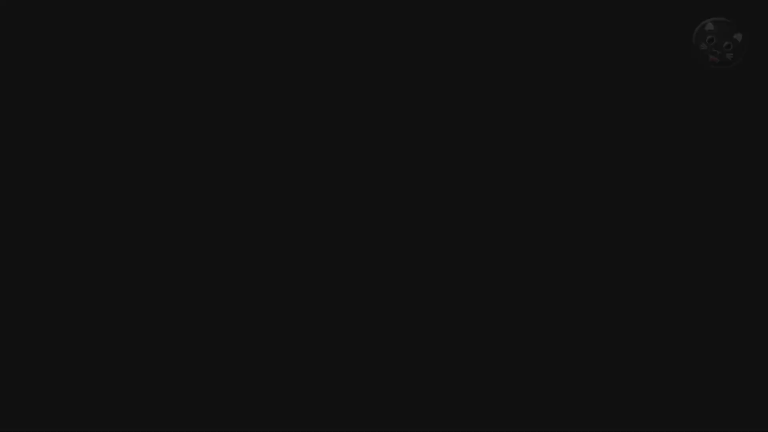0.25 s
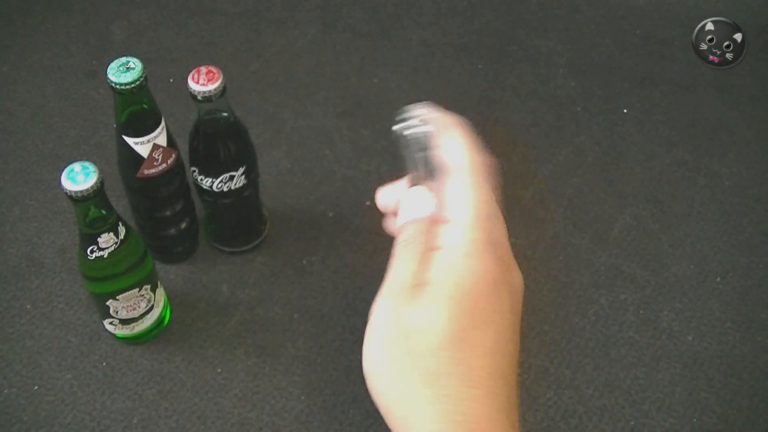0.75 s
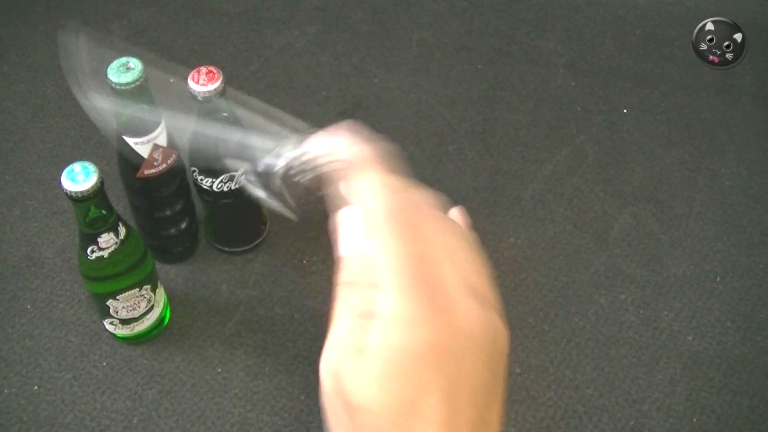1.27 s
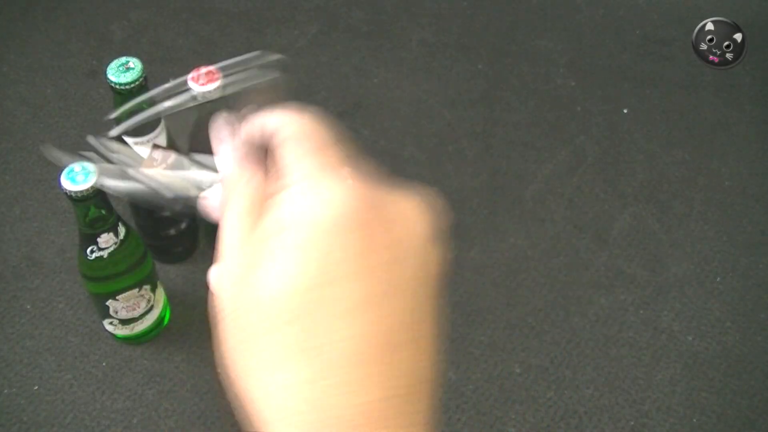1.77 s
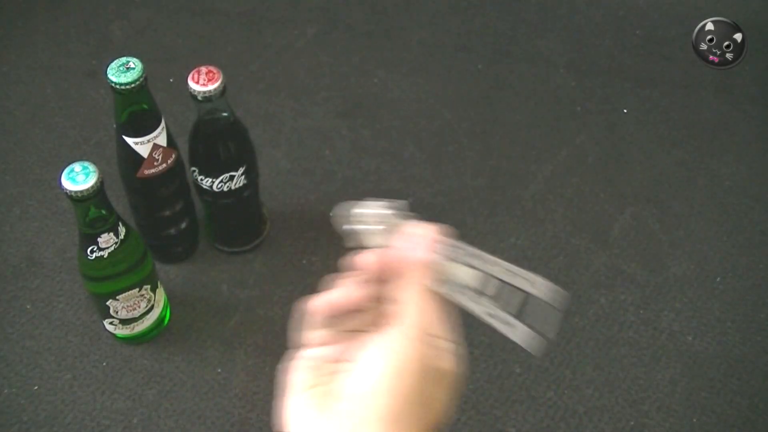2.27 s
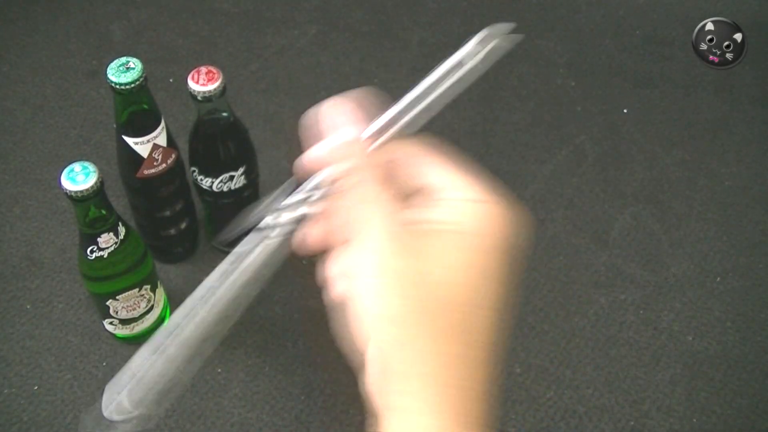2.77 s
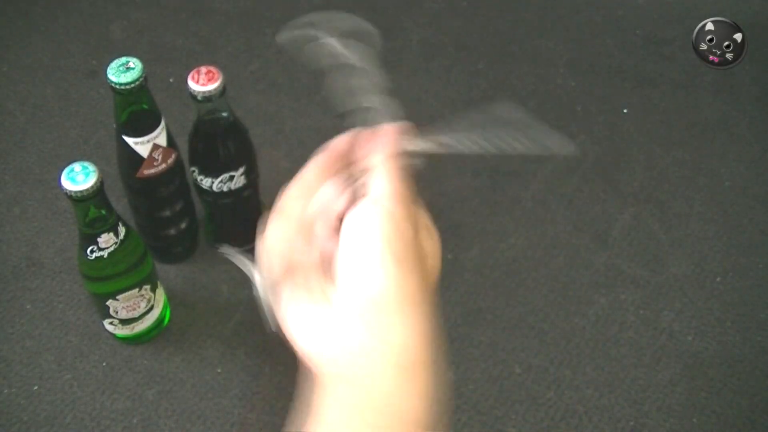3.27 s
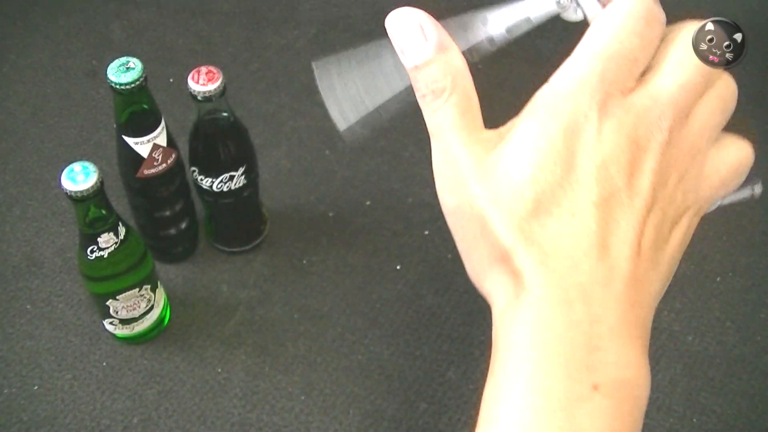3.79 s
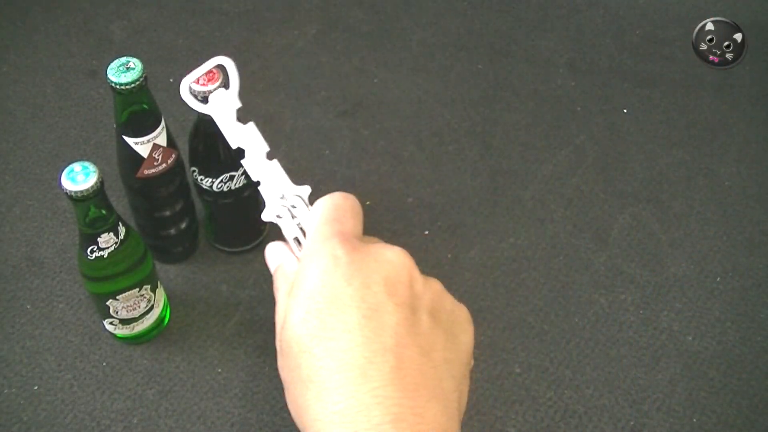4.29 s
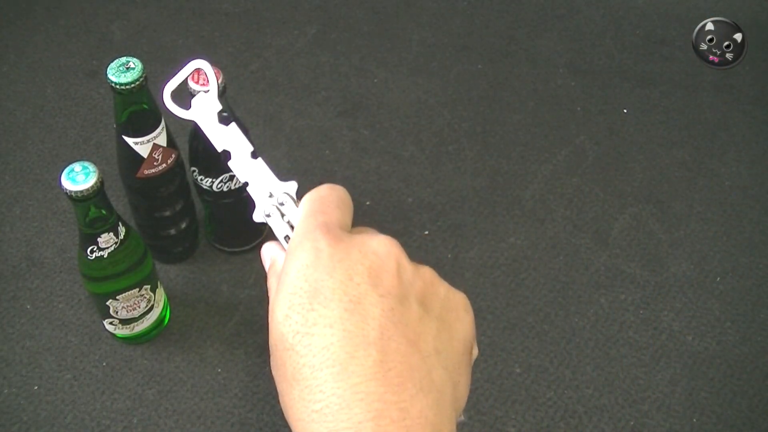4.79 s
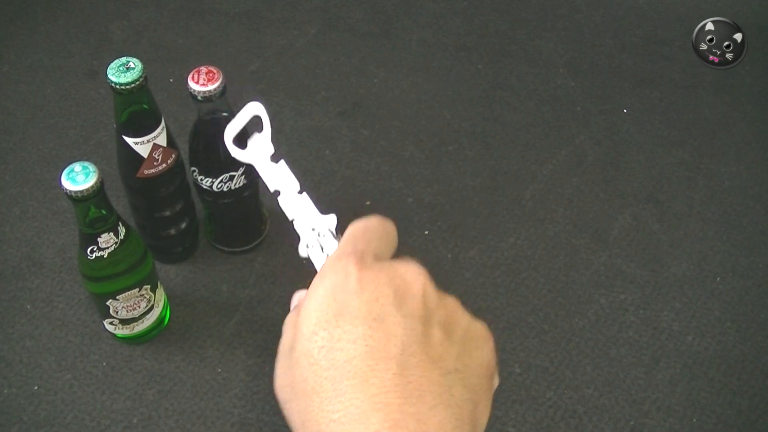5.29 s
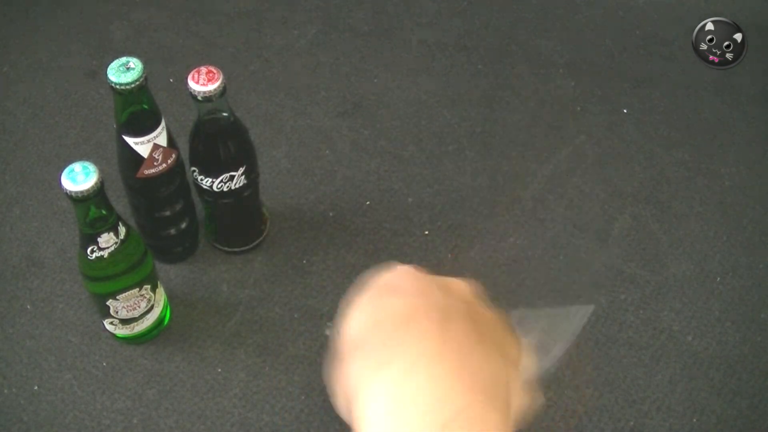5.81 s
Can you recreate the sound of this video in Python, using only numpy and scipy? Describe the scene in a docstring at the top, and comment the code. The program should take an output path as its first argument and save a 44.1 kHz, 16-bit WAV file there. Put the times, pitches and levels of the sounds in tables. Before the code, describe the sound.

Close to the microphone in a quiet carpeted room, a hinged steel bottle opener is flipped by hand. Light clicks grow into hard, bright clacks and tiny loose rattles at uneven intervals, with a few soft palm pats. After about four seconds it rests, leaving faint hiss, hum and tiny high blips; then flipping resumes with a sharp burst.

```python
"""Steel clicks, cracks and short rattles over faint rumble, 50/100 Hz hum, hiss and 2930 Hz blips.
A steel butterfly bottle opener is flipped by hand, close by, in a quiet carpeted room.
Touches are millisecond noise bursts and pushes into damped and free modes of pivot, blade, handles, latch.
Palm pats are low two-stage rings; the room is decaying stereo noise; the floor is shaped noise and sines."""
import sys
import numpy as np
from scipy import signal
from scipy.fft import rfft, irfft
from scipy.io import wavfile

SR = 44100
rng = np.random.default_rng(int(sys.argv[2]) if len(sys.argv) > 2 else 0)


def transcribe(signal):
    """Save signal, clipped to [-1, 1], as a 16-bit WAV file at the path in sys.argv[1]."""
    frames = np.atleast_2d(signal).T
    limited = np.clip(frames, -1, 1)
    pcm = np.round(limited * 32767).astype(np.int16)
    wavfile.write(sys.argv[1], SR, pcm)


N = 266805


def from_db(db):
    """Amplitude gain of a level in dB."""
    return 10 ** (np.asarray(db) / 20)


def rms_one(x):
    """Scale to rms 1."""
    return x / np.sqrt(np.mean(x ** 2) + 1e-20)


def at_hz(points, hz):
    """Interpolate (Hz, value) points on a log-frequency axis."""
    point_hz, value = np.transpose(points)
    return np.interp(np.log(hz), np.log(point_hz), value)


def band(x, edges_hz, kind="band"):
    """Second-order Butterworth design: band, low or high pass."""
    return signal.sosfilt(signal.butter(2, edges_hz, kind, fs=SR, output="sos"), x)


def stereo_pair(mid, side, correlation):
    """Mix two independent noises into left and right of the given correlation."""
    return np.sqrt(1 + correlation) * mid + np.sqrt(1 - correlation) * side * [[1], [-1]]


def ring(force, hz, t60_s):
    """Two-pole resonator: a unit click starts a decaying sine of initial height 1."""
    radius = from_db(-60 / (t60_s * SR))
    w = 2 * np.pi * hz / SR
    # the tiny offset avoids denormals
    return signal.lfilter([0, np.sin(w)], [1, -2 * radius * np.cos(w), radius ** 2], force + 1e-18)


def air():
    """Room and microphone floor: coloured noise with frequency-dependent stereo correlation."""
    # floor spectrum: (frequency [Hz], relative density [dB])
    floor_spectrum = [(15, -50.5), (25, -19), (48, -14), (70, -16), (92, -5), (124, -7.5), (182, -2),
                      (273, -3.5), (349, -4.5), (651, -9.5), (787, -8), (2090, -15), (2980, -15.5),
                      (14000, -35), (16500, -52)]
    # stereo likeness of the floor: (frequency [Hz], left-right correlation [0-1])
    floor_correlation = [(60, 0.56), (240, 0.59), (950, 0.357), (3770, 0.68), (15000, 1)]
    level_db_rms = -59.5
    hz = np.maximum(np.arange(N // 2 + 1) * SR / N, 1)
    mid, side = rfft(rng.standard_normal((2, N)))
    correlation = np.clip(at_hz(floor_correlation, hz), 0, 1)
    pair = stereo_pair(mid, side, correlation)
    coloured = irfft(pair * from_db(at_hz(floor_spectrum, hz)), N)
    return from_db(level_db_rms) * rms_one(coloured)


def hum():
    """Mains hum: steady sines of random phase."""
    # mains lines: (frequency [Hz], rms level [dB])
    mains_lines = [(50, -86), (100, -74.5)]
    t = np.arange(N) / SR
    return sum(from_db(db) * np.sqrt(2) * np.sin(2 * np.pi * hz * t + 6 * rng.random())
               for hz, db in mains_lines)


def blips():
    """Gaussian tone bursts on a 30 per second grid, some missing, uneven, heard in spells."""
    # spells with blips: (start [s], end [s])
    spells = [(.05, .34), (.44, .82), (4.2, 4.39), (4.78, 5.14), (5.28, 5.38), (5.45, 5.6)]
    period_s, first_s, sigma_s = 1001 / 30000, .0229, .006
    blip_hz, max_db, sounding_share = 2930, -63, 0.71
    t = np.arange(N) / SR - first_s
    slot = np.round(t / period_s)
    centre_s = first_s + slot * period_s
    draws = rng.random((200, 2))
    slot_gain = from_db(max_db - 4 * draws[:, 0]) * (draws[:, 1] < sounding_share)
    strength = slot_gain[slot.astype(int)]
    in_spell = sum((centre_s > start) & (centre_s < end) for start, end in spells)
    envelope = np.exp(-.5 * ((t - slot * period_s) / sigma_s) ** 2)
    return in_spell * strength * envelope * np.sin(2 * np.pi * blip_hz * t)


def shares(place, heft_db, steel_db):
    """dB to palm, pivot, blade, handles, latch: steel parts further round from the strike get less."""
    palm_below_pivot_db, away_db = -4.5, 5
    part_place = np.array([2, 1, 0])   # blade, handles, latch on a circle of 3
    away = 1 - np.cos(2 * np.pi * (place - part_place) / 3)
    return (heft_db + palm_below_pivot_db, heft_db, *(steel_db - away_db * away))


def contacts():
    """Blows, Poisson rattle clicks and stray ticks, as rows (sample, dB, 5 part dB, free dB)."""
    # place: 0 latch, 1 handles, 2 blade, 3 latch again; heft: drive of pivot and palm;
    # free: drive of long modes when the grip is loose
    # blows: (time [s], level [dB], place [0-3 round], heft [dB], free ringing [dB])
    blows = [(0.073, -45, 2.46, -21, -20), (0.718, -52, .5, -20, -30), (0.734, -43, .2, -22, -20),
             (0.7707, -36.5, 2.8, -33, -3), (0.7833, -33.5, 0.46, -42, -22), (0.83, -45, 2.7, -20, -20),
             (0.842, -47, 0.25, -14, -20), (0.9171, -43, 3.4, -12, -23), (0.9777, -28, 2.55, -12.5, -10),
             (1.0056, -41.5, 0.66, -18, -20), (1.0718, -37.5, 0.65, -9.5, -16),
             (1.1627, -36.5, 0.67, -21, -21), (1.1783, -37, 0.88, -31, -22), (1.2022, -39.5, .1, -23, -22),
             (1.2401, -35, .1, -33, -19), (1.2496, -26, 0.25, -19, -7), (1.2618, -39, 1.9, -17, -6),
             (1.351, -45, .1, -21, -19), (1.3602, -41.5, 2.6, -14, 2), (1.3872, -28.5, 2.9, -22, -9),
             (1.4084, -44, .6, -7, -22), (1.4178, -30, .1, -19, -30), (1.4375, -23, 2.2, -19, -16),
             (1.4566, -12, 2.65, -19, -12), (1.5187, -39.5, 0.81, -19, -25), (1.5441, -36, 0.15, -13, -16),
             (1.6051, -17, 1.07, -20, -16), (1.663, -42, .1, -11, -20), (1.6964, -41.5, 2.5, -16, -20),
             (1.7199, -42, .1, -19, -13), (1.7986, -27, 2.54, -26, -2), (1.8092, -24, 0.61, -24, -1.5),
             (1.849, -29, .2, -22, -20), (1.9052, -41.5, 2.6, -17, -19), (1.979, -44, 2.9, -14, -20),
             (2.0104, -37, 0.48, -14, -23), (2.0486, -43, .6, -18, -19), (2.0603, -37.5, 0.47, -16, -21),
             (2.0702, -15, 0.35, -25, -10), (2.0731, -13.5, 1.1, -17, -7), (2.0884, -16.5, 0.34, -17, -6.5),
             (2.102, -12, 0.98, -24, -4), (2.1347, -26.5, 2.5, -26, -13), (2.2574, -54, .3, -24, -20),
             (2.5584, -50, .7, -23, -19), (2.6138, -33, 3.2, -19, 4), (2.624, -33, 2.8, -17, 1),
             (2.6382, -33, 2.5, -10.5, -7), (2.7058, -40, 2.7, -7.5, -1), (2.8425, -45, 2.1, -2, -18),
             (2.8912, -16.5, 1.36, -28, -23), (2.9398, -33.5, 0.51, 1.5, -25), (3.0326, -47, .5, -22, -18),
             (3.061, -38.5, 2.9, -9, -8), (3.0866, -40.5, .2, -5, -20), (3.114, -41, .1, -28, -22),
             (3.135, -31, .05, -11, -7), (3.1915, -45, .05, -14, -20), (3.2005, -49, .3, -20, -20),
             (3.2241, -29, 0.41, -19, -19), (3.264, -28, 0.57, -14, -19), (3.3118, -33, .1, -15, -19),
             (3.3161, -37, 0.17, -14, -20), (3.319, -22.5, .05, -29, -20), (3.3663, -41, 0.57, -13, -1.5),
             (3.3707, -37.5, 3.5, -10, -6), (3.39, -34.5, .2, -12, 7), (3.3963, -30, 2.7, -15, 0),
             (3.4089, -22.5, .05, -8, -6.5), (3.5073, -33, 2.3, -10, -18), (3.5148, -27.5, 2.7, -15.5, 2),
             (3.5224, -11, 1, -28, -7), (3.721, -39.5, 3.5, -12.5, -9), (3.738, -49, 0.095, -25, -17),
             (3.7448, -42, 0.67, -24, -24), (3.8033, -17.5, 1.1, -9, -4), (3.895, -29, 2.65, -19, -6.5),
             (3.922, -34.5, 2.1, -15, -23), (3.966, -45.5, .3, -18, -18), (4.1302, -44, 2.6, -10, -20),
             (4.1473, -32, 2.25, -13.5, -15), (5.4292, -26.5, 2.25, -14.5, -21),
             (5.5794, -39.5, 2.35, -16, -13), (5.6388, -43.5, 3.3, -16, -22),
             (5.6804, -39.5, 2.8, -18, 6.5), (5.6942, -41, 2.9, -24, -20), (5.8002, -18.5, 1.7, -26, -2),
             (5.8046, -12, 0.71, -17, -16), (5.8273, -26, 1.2, -24, -11), (5.8409, -19.5, 3.1, -24, 1),
             (5.8479, -22.5, 2.0, -33, .6), (5.893, -30, .2, -18, -5), (5.9016, -31, .2, -17, 9),
             (5.9131, -28.5, 1.1, -15.5, -25), (6.0329, -44, 2.4, -2, -20)]
    # rattles on loose pivots: (start [s], length [s], level [dB], place [round], heft [dB], free [dB])
    rattles = [(0.76, .07, -57, 0.66, -21, -11), (1.158, .045, -49.5, 0.22, -30, -5),
               (1.228, .05, -42.5, 2.6, -17, 4.5), (1.436, .025, -39, 2.6, -18, -11),
               (1.595, .11, -53.5, 2.8, -7, -28), (1.839, .045, -41, 3, -14.5, 1),
               (2.078, .09, -32.5, .9, -15, -7), (2.591, .09, -45.5, 1.6, -19, 0),
               (2.884, 0.027, -37.5, 1.3, -21, -33), (3.128, .035, -46.5, 3.9, -15, -23),
               (3.217, .03, -43.5, 2.6, -12, -16), (3.365, .09, -46, 3.1, -8, 3),
               (3.515, .1, -41, 1.2, -15.5, -7), (3.792, .11, -41.5, 1.5, -12, -28),
               (3.885, .04, -35.5, 1.2, -11.5, -13), (5.811, .08, -34, 2.43, -18, 3.5),
               (5.886, .04, -38.5, .9, -19, -13)]
    # hand keeps the tool moving: (start [s], end [s])
    flipping = [(.7, 2.27), (2.54, 4.17), (5.5, 6.05)]
    steel_db = -4.5
    rattle_per_s, rattle_rise_s, rattle_steel_db = 1100, 0.012, -5
    ticks_per_s, tick_min_db, tick_heft_db, tick_free_db = 9.9, -59.5, -17, -21.5

    rows = []
    for s, db, place, heft_db, free_db in blows:
        rows.append((s * SR, db, *shares(place, heft_db, steel_db), free_db))

    for start, length, level_db, place, heft_db, free_db in rattles:
        draws = rng.random((300, 2))
        s = np.cumsum(-np.log(draws[:, 0])) / rattle_per_s
        end_s = max(length, 1.2 * rattle_rise_s)
        swell_db = np.interp(s, [0, rattle_rise_s, end_s], [-14, 0, -24])
        size_db = np.minimum(-3.5 * np.log(draws[:, 1]), 9)
        parts = shares(place, heft_db, steel_db + rattle_steel_db)
        inside = s < length
        for click_s, click_db in zip(s[inside], (swell_db + size_db)[inside]):
            rows.append(((start + click_s) * SR, level_db + click_db, *parts, free_db))

    for start, end in flipping:
        draws = rng.random((60, 3))
        times = start + np.cumsum(-np.log(draws[:, 0])) / ticks_per_s
        for s, (_, size, turn) in zip(times, draws):
            if s < min(end, N / SR):
                parts = shares(3 * turn, tick_heft_db, steel_db)
                rows.append((s * SR, tick_min_db + 8 * size, *parts, tick_free_db))
    return np.array(rows)


def flutter():
    """Loose joints make a ringing mode waver: a gain of constant plus low-passed noise, rms near 1."""
    cutoff_hz, share = 109.8, 0.86
    noise = rms_one(band(rng.standard_normal(N), cutoff_hz, "low"))
    return np.sqrt(1 - share ** 2) + share * noise


def opener():
    """Touches as noisy chatter: heard bare, driving damped modes, and pushing free modes into ringing."""
    # modes of each part: (frequency [Hz], level [dB], t60 [s]); short ones are damped by the grip
    palm_modes = [(345, -11, .015), (596, -18, 0.01), (910, -2.5, 0.0069), (1256, -4.5, 0.016)]
    pivot_modes = [(1960, 3, 0.0033), (2176, -0.5, .045), (2410, -2.5, 0.0022)]
    blade_modes = [(3100, 1, .004), (3235, -15, .09), (6000, -2, .003), (6115, -10, .18),
                   (12900, -24, .045)]
    handle_modes = [(3340, -25, .07), (3876, -16.5, 0.24), (3984, -10, 0.07), (4030, -1.5, 0.0058),
                    (4790, 1.5, 0.0018), (10180, -7.5, 0.083), (10100, 2.5, 0.0029), (10100, -15.5, 0.045),
                    (10520, -2.5, 0.0015)]
    latch_modes = [(5220, -5, 0.0045), (6870, -5, 0.0029), (7550, -8, 0.04), (7990, -0.5, 0.0066),
                   (8310, -13, 0.042), (8800, 2, 0.0027), (11140, -1.5, 0.0013), (13500, -9, 0.0043)]
    contact_peak_s, skitter_s, skitter_db = 0.00032, 0.0039, -1.5
    free_above_s, damped_max_s = .04, .005   # t60 limits
    crack_db, strike_db, spread_db = 8, 2.5, 1
    held = 0.94   # dB of free ringing lost per dB below the hardest-hit steel part
    radiates_hz = 990   # thin steel radiates little below this

    touch = contacts()
    at, lag = touch[:, 0].astype(int), np.arange(400)
    touch_db, free_db = touch[:, 1], touch[:, -1]
    rise = lag / (contact_peak_s * SR)
    envelope = rise * np.exp(1 - rise)
    envelope = envelope + from_db(skitter_db) * np.exp(-lag / (skitter_s * SR)) * (lag > 0)
    chatter = rng.standard_normal((len(touch), len(lag))) * envelope
    chatter /= np.sqrt(np.sum(chatter ** 2, axis=1, keepdims=True))
    spread_at = np.minimum(at[:, None] + lag, N - 1).ravel()

    def chatter_train(gain):
        """Sum the unit-energy chatters, one gain per touch."""
        return np.bincount(spread_at, (gain[:, None] * chatter).ravel(), N)

    parts = []
    all_modes = [palm_modes, pivot_modes, blade_modes, handle_modes, latch_modes]
    hardest_db = touch[:, 3:-1].max(axis=1)
    for index, modes in enumerate(all_modes):
        part = 0
        part_db = touch[:, 2 + index]
        loose_db = free_db + held * (part_db - hardest_db)
        for hz, mode_db, t60_s in modes:
            free = t60_s > free_above_s
            level_db = touch_db + part_db + free * loose_db + mode_db + strike_db
            gain = from_db(level_db + spread_db * rng.standard_normal(len(at)))
            strength = gain * rng.choice([-1, 1], len(at))
            if free or index == 0:   # free and palm modes feel the contact as one push
                sound = ring(np.bincount(at, strength, N), hz, t60_s)
                part = part + sound * (flutter() if free else 1)
            else:
                part = part + ring(chatter_train(strength), hz, min(t60_s, damped_max_s))
        parts.append(part)

    crack = band(chatter_train(from_db(touch_db + crack_db)), [1700, 10800])
    steel = crack + sum(parts[1:])
    radiated = band(band(steel, radiates_hz, "high"), radiates_hz, "high")
    return radiated + band(parts[0], [249, 2500])


def room(x):
    """Diffuse echoes: convolution with stereo noise dying at its own rate in each half-octave band."""
    # reverberation: (frequency [Hz], relative level [dB], t60 [s])
    echo_bands = [(500, -10.5, .25), (2020, -11, 0.2), (5100, -9.5, .2), (9830, -13.5, 0.18),
                  (15200, -21.5, 0.073)]
    correlation, onset_s = 0.92, 0.0033
    t = np.arange(SR // 2) / SR
    hz, level_db, t60_s = np.transpose(echo_bands)
    tail, edges_hz = 0, 200 * 2 ** np.arange(0, 6.6, .5)
    for low, high in zip(edges_hz, edges_hz[1:]):
        mid, side = band(rng.standard_normal((2, len(t))), [low, high])
        centre = np.log(np.sqrt(low * high))
        decay_s = np.interp(centre, np.log(hz), t60_s)
        unit_energy = np.sqrt(2 * np.log(1000) / (decay_s * SR))
        dying = from_db(-60 * t / decay_s) * unit_energy
        gain = from_db(np.interp(centre, np.log(hz), level_db))
        tail = tail + gain * dying * stereo_pair(mid, side, correlation)
    tail = tail * np.clip(t / onset_s, 0, 1)
    return signal.fftconvolve(x[None], tail, axes=1)[:, :N]


def pats():
    """Handle landing on skin: two equal resonators in series give a soft low bump."""
    # pats: (time [s], level [dB], frequency [Hz])
    palm_pats = [(2.891, -42.5, 615), (2.9398, -37.5, 645), (3.066, -40.5, 325), (3.383, -54.5, 300.5),
                 (3.803, -40, 553), (3.893, -41, 594)]
    t60_cycles = 3.63   # of each resonator
    out = np.zeros(N)
    for s, level_db, hz in palm_pats:
        click = np.zeros(N)
        click[round(s * SR)] = from_db(level_db)
        t60_s = t60_cycles / hz
        bump = ring(ring(click, hz, t60_s), hz, t60_s)
        out += bump * hz / SR * 8.2   # offsets the height gained in series
    return out


def scene():
    """Opener and pats, direct and echoed, over the floor."""
    direct = opener() + pats()
    return direct + room(direct) + air() + hum() + blips()


def record(dry):
    """Right port takes more bass; a short silence and fade open the sound; low-passes cut the top."""
    # channel balance: (frequency [Hz], left minus right [dB])
    balance = [(60, -3.5), (240, -2), (950, -1.5), (3770, -1), (15000, 0.0)]
    start_s, fade_s = .036, 0.0056
    treble_hz, stop_hz = 14800, 16900   # gentle roll-off, 60 dB stopband edge
    hz = np.maximum(np.arange(N // 2 + 1) * SR / N, 1)
    half_balance_db = at_hz(balance, hz) / 2 * [[1], [-1]]
    ports = irfft(rfft(dry) * from_db(half_balance_db), N)
    opened = ports * np.clip((np.arange(N) / SR - start_s) / fade_s, 0, 1)
    rolled_off = band(opened, treble_hz, "low")
    return signal.sosfilt(signal.cheby2(12, 60, stop_hz, fs=SR, output="sos"), rolled_off)


dry = scene()
out = record(dry)
transcribe(out)
```